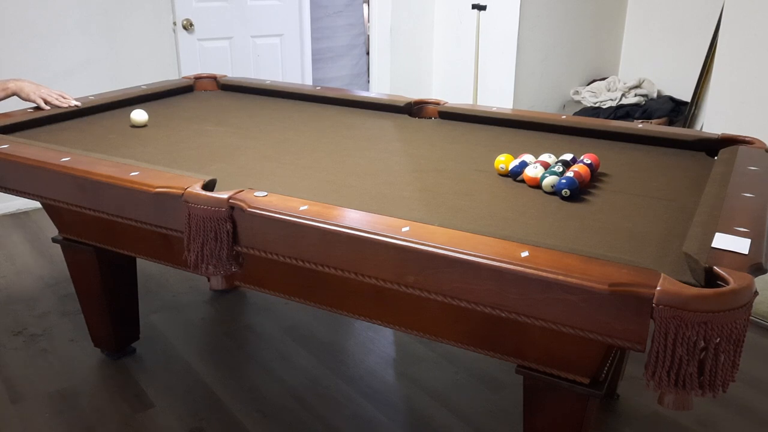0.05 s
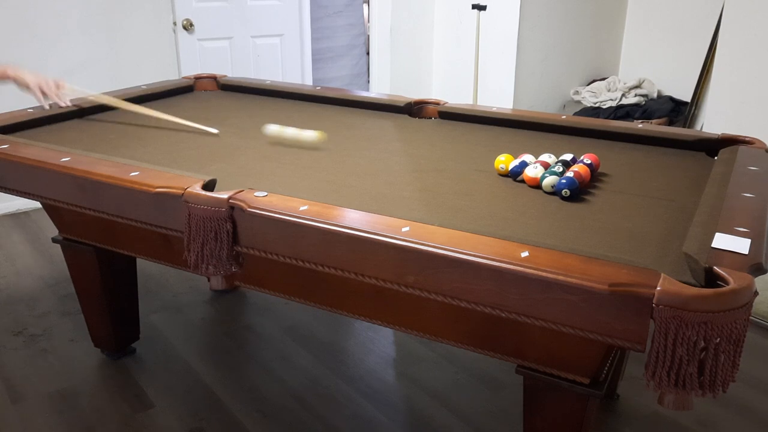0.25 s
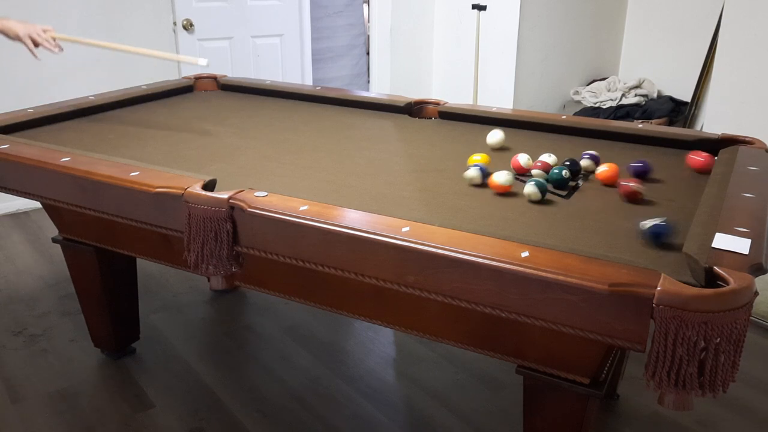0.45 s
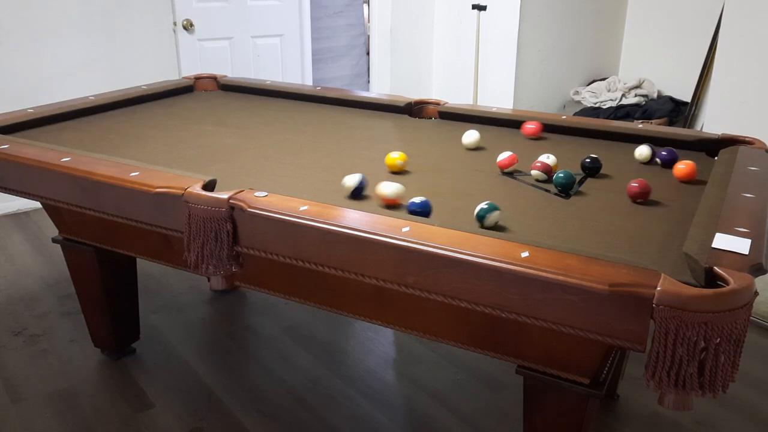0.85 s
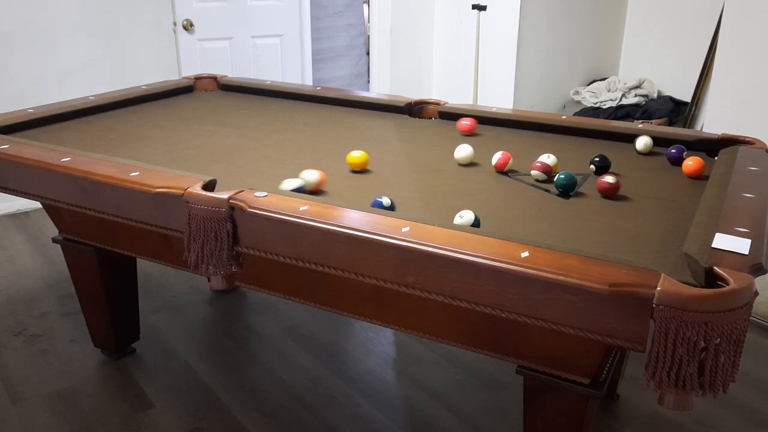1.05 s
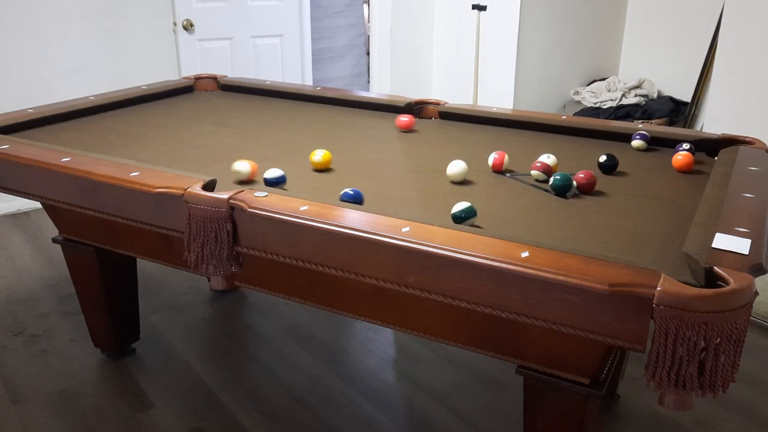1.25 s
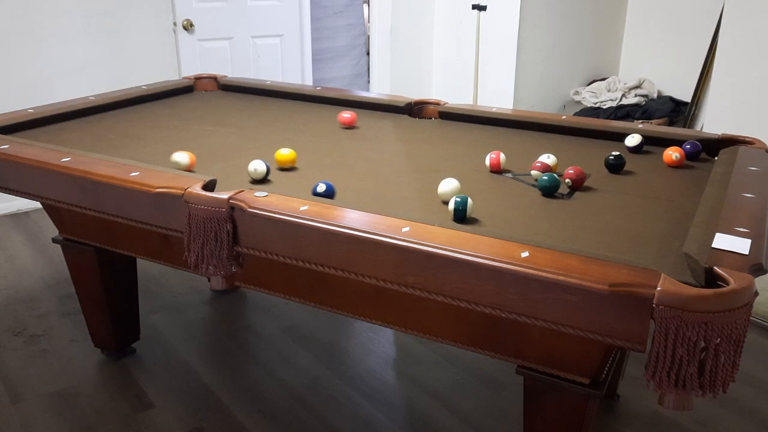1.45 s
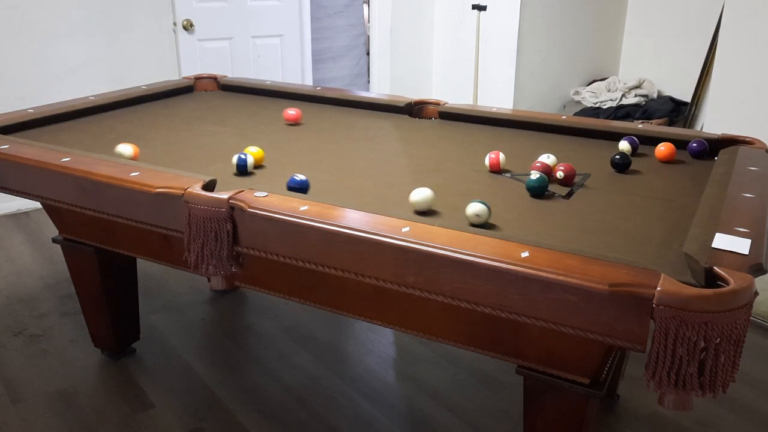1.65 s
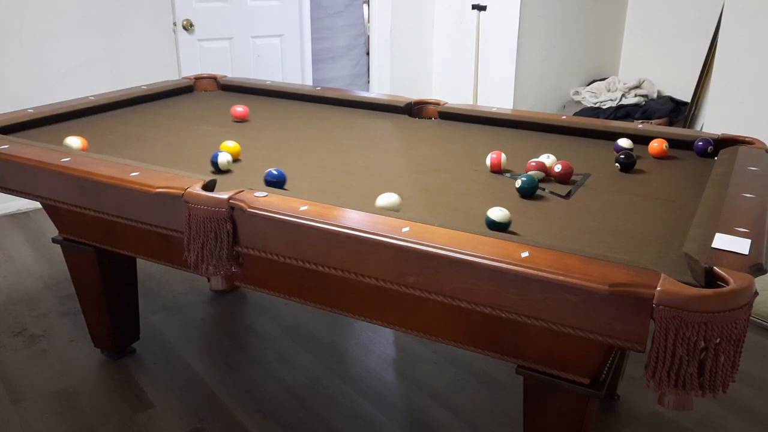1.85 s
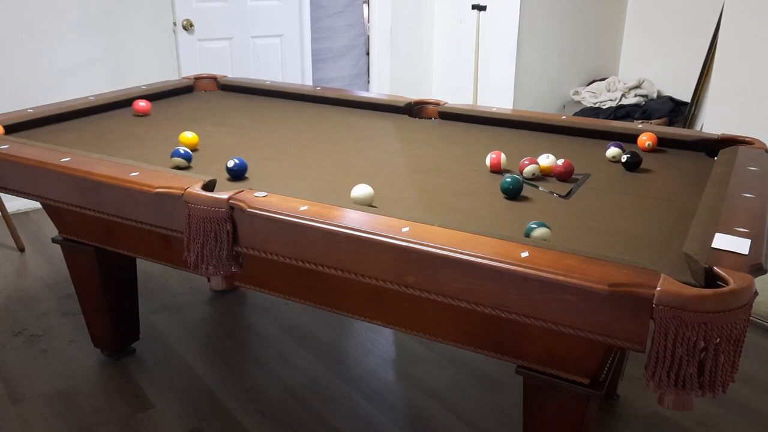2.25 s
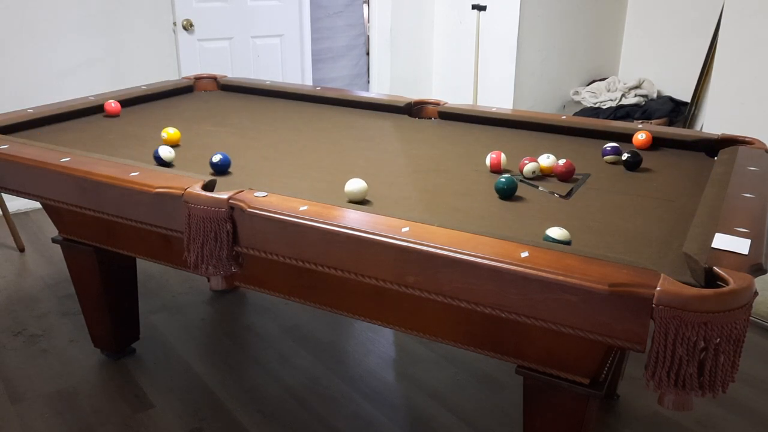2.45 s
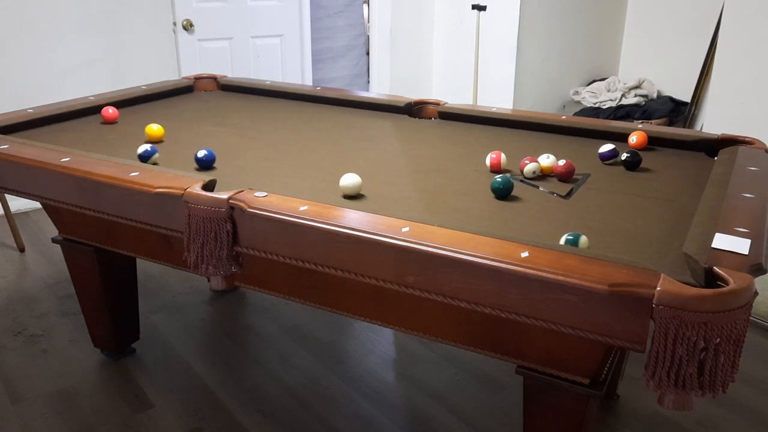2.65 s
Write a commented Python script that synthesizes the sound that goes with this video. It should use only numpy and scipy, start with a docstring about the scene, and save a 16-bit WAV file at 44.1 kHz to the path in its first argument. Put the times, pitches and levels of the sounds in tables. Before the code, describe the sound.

Pool balls crack apart on the break, then roll, click and knock around the table.

```python
"""A rack of pool balls cracks apart in a break shot, each elastic collision radiating one short pulse.
The cue first slides over the hand and thumps the white ball; then the balls click, rumble over the
cloth and bump the cushions, exciting the modes of the table's frame. One drops into a pocket, and two
hard clacks follow. A bare room reverberates over a soft hiss, and a limiter ducks under the crack."""
import sys
import numpy as np
from scipy import signal
from scipy.fft import rfft, irfft
from scipy.io import wavfile
from scipy.ndimage import uniform_filter1d, minimum_filter1d

SR = 44100
rng = np.random.default_rng(int(sys.argv[2]) if len(sys.argv) > 2 else 0)


def file_out(sig):
    """Save sig as 16-bit WAV at sys.argv[1]."""
    # one column per channel
    cols = np.atleast_2d(sig).T
    # limit, then scale
    lim = np.clip(cols, -1, 1)
    pcm = np.round(lim * 32767).astype(np.int16)
    wavfile.write(sys.argv[1], SR, pcm)


N = 123479


def amp(db):
    """The decibel scale: 20 dB is a factor of ten in amplitude."""
    return 10 ** (np.asarray(db) / 20)


def curve_at(points, hz):
    """Linear interpolation along log frequency."""
    f, value = np.transpose(points)
    return np.interp(np.log(hz + 1), np.log(f), value)


def add(mix, start_s, sound):
    """Superposition: a sound sums into the mix from its start time."""
    part = mix[:, round(start_s * SR):][:, :sound.shape[1]]
    part += sound[:, :part.shape[1]]


# Stereo width (frequency [Hz], side relative to mid [dB])
STEREO_WIDTH = [(60, -19.5), (150, -15), (300, -5.5), (600, -7), (1200, 1.5), (8000, 0)]
# Stereo balance (frequency [Hz], left minus right [dB])
STEREO_BALANCE = [(60, -1), (250, 1.5), (550, 5), (1100, -3.5), (2200, 2), (4300, -4.5), (8000, -4)]

def spread(spectra, hz):
    """Mid-side stereo: two independent spectra become left and right, nearly coherent in the bass."""
    width = amp(curve_at(STEREO_WIDTH, hz))
    lean = amp(curve_at(STEREO_BALANCE, hz) / 2)
    mid, side = spectra[0], width * spectra[1]
    return np.array([(mid + side) * lean, (mid - side) / lean]) / np.sqrt(1 + width ** 2)


# Reverberation time of the room (frequency [Hz], T60 [s])
ROOM_T60 = [(60, 0.02), (150, 0.82), (330, 0.5117), (800, 0.7972), (2000, 0.668), (4000, 0.5946),
            (7000, 0.63), (14000, 0.35)]

def room(direct_db, build_s, size=56000, echoes=10, echo_span_s=.035, echo_db=-20):
    """Room impulse response: direct sound, early reflections and an exponentially decaying tail."""
    t = np.arange(size) / SR
    density = np.minimum(.04 + t, 1)  # reflections arrive ever more densely
    taps = rng.standard_normal((2, size)) * (rng.random((2, size)) < density)
    hz, times, spectra = signal.stft(taps / np.sqrt(density), SR, nperseg=512)
    decay = amp(-60 * times[:, None] / curve_at(ROOM_T60, hz))
    spectra = spread(spectra.transpose(0, 2, 1), hz) * decay
    path = signal.istft(spectra.transpose(0, 2, 1), SR, nperseg=512)[1][:, :size]
    path *= 1 - np.exp(-t / build_s)
    tail_norm = np.linalg.norm(path[0])
    for channel in path:
        delays = (rng.random(echoes) * echo_span_s * SR).astype(int)
        channel[delays] += tail_norm * amp(echo_db) * rng.uniform(-1, 1, echoes)
    path[:, 0] += tail_norm * amp(direct_db)
    return path


def shaped_noise(envelope, spectrum):
    """Amplitude modulation: filtered noise of unit rms follows a level envelope."""
    hz = np.fft.rfftfreq(N, 1 / SR)
    white = spread(rfft(rng.standard_normal((2, N))), hz)
    noise = irfft(white * amp(curve_at(spectrum, hz)), N)
    noise /= np.sqrt(np.mean(noise ** 2) + 1e-20)
    return noise * amp(np.interp(np.arange(N) / SR, *np.transpose(envelope)))


# Envelope of the hiss (time [s], level [dB])
HISS_ENVELOPE = [(.3, -58), (.6, -71), (.76, -51), (1.05, -77.5), (1.2, -85.5), (1.55, -90.5), (1.92, -67),
                 (2.1, -70), (2.25, -62.5), (2.8, -53.5)]
# Its spectrum (frequency [Hz], relative level [dB])
HISS_SPECTRUM = [(500, -8.5), (1000, 5), (2200, -4.5), (3800, -9.5), (6000, -4.5), (7800, -15), (9500, -27),
                 (13000, -21)]

def hiss():
    """Broadband noise: a soft hiss swells and fades."""
    return shaped_noise(HISS_ENVELOPE, HISS_SPECTRUM)


# Envelope of the sliding cue (time [s], level [dB])
SLIDE_ENVELOPE = [(0, -55), (.13, -58), (.2, -53.5), (.25, -47.5), (.3, -90.5)]
# Its spectrum (frequency [Hz], relative level [dB])
SLIDE_SPECTRUM = [(50, -15.5), (230, -9.5), (350, 7.5), (500, -3), (800, -4), (2200, -5), (3800, -11),
                  (6000, -5.5), (9500, -23.5), (13000, -17.5)]

def cue_slide():
    """Sliding friction: the shaft rubs over the hand."""
    return shaped_noise(SLIDE_ENVELOPE, SLIDE_SPECTRUM)


# Envelope of the rolling balls (time [s], level [dB])
ROLL_ENVELOPE = [(0, -76), (.22, -70), (.3, -29), (.7, -43.5), (1.1, -58), (1.55, -60.5), (1.9, -62),
                 (2.15, -60.5), (2.3, -51.5), (2.8, -45.5)]
# Their spectrum (frequency [Hz], relative level [dB])
ROLL_SPECTRUM = [(22, -48), (55, 0.5), (90, 6), (150, 0.5), (260, -12), (330, -10.5), (420, -28),
                 (1500, -39.5), (5000, -55)]

def rolling():
    """Rolling contact noise: the balls rumble over the cloth."""
    return shaped_noise(ROLL_ENVELOPE, ROLL_SPECTRUM)


def pulse(spectrum, tilt_db, size=4096):
    """Minimum phase: the most compact causal pulse with a given spectrum, at unit energy."""
    hz = np.fft.rfftfreq(size, 1 / SR)
    octaves = np.log2(np.maximum(hz, 60) / 1000)
    dc_cut_db = 40 * np.exp(-hz / 10)
    cepstrum = irfft(np.log(amp(curve_at(spectrum, hz) + tilt_db * octaves - dc_cut_db)))
    cepstrum[1:size // 2] *= 2  # fold onto positive time
    cepstrum[size // 2 + 1:] = 0
    shape = irfft(np.exp(rfft(cepstrum)))
    return shape / np.linalg.norm(shape)


def impact(spectrum, direct_db, build_s, tilt_db=0):
    """Convolution: one contact pulse is heard through the room's impulse response."""
    return signal.fftconvolve(room(direct_db, build_s), pulse(spectrum, tilt_db)[None], axes=1)


def impacts(events, spectrum, direct_db, build_s):
    """Impulsive excitation: brief contacts whose only tail is the room's reverberation."""
    out = np.zeros((2, N))
    for s, db, tilt_db in events:
        add(out, s, amp(db) * impact(spectrum, direct_db, build_s, tilt_db))
    return out


def ring(modes, drive_db=0, size=56000, build_s=.01):
    """Free vibration: each mode is a damped sinusoid of random phase, with a smoothed onset."""
    t = np.arange(size) / SR
    hz, db, t60 = np.transpose(modes)
    cycles = hz[:, None] * t + rng.random((len(hz), 1))
    envelopes = amp((db + drive_db)[:, None] - 60 * t / t60[:, None])
    sines = envelopes * np.sin(2 * np.pi * cycles)
    return sines.sum(0)[None] * (1 - np.exp(-t / build_s)) ** 2


# Modes of the table's frame (frequency [Hz], relative level [dB], T60 [s])
FRAME_MODES = [(139.4, -6.5, 1.1), (315.6, -9.5, 0.83), (349.6, -7.5, 0.36), (396.5, -7, 0.46),
               (479, -7, 0.2), (522, -6.5, 0.43), (598, -11, 0.73)]

def frame(spectrum, tilt_db=0):
    """Modal excitation: each mode rings as strongly as the blow's spectrum drives it."""
    hz = np.transpose(FRAME_MODES)[0]
    slope_db = tilt_db * np.log2(hz / hz[0]) - max(2 * tilt_db, 0)
    return ring(FRAME_MODES, curve_at(spectrum, hz) + slope_db)


def padded_impacts(events, spectrum, frame_db, direct_db):
    """Structural coupling: padded blows also set the table's frame ringing."""
    out = impacts(events, spectrum, direct_db, build_s=.0079)
    for s, db, tilt_db in events:
        add(out, s, amp(db + frame_db) * frame(spectrum, tilt_db))
    return out


# Ball falling into the pocket (time [s], level [dB], tilt [dB/octave])
POCKET_HITS = [(2.323, -35.5, -1), (2.345, -22, -4), (2.376, -29, -2), (2.47, -29, -9), (2.52, -32, -6)]
# Spectrum of each hit (frequency [Hz], relative level [dB])
POCKET_SPECTRUM = [(25, -33), (42, -28), (65, -13.5), (140, -6.5), (185, -11.5), (320, 7.5), (410, -2.5),
                   (520, -16), (3000, -48)]

def pocket_drop():
    """Inelastic impact: a ball lands in the pocket in a few dull knocks."""
    return padded_impacts(POCKET_HITS, POCKET_SPECTRUM, frame_db=3.5, direct_db=-4)


# Ball on cushion (time [s], level [dB], tilt [dB/octave])
CUSHION_HITS = [(.325, -17, 0.5), (.515, -16.5, 1.5), (.555, -20.5, 2), (.615, -23.5, 3.5),
                (.665, -26.5, 2.5), (.86, -41, 4), (1.13, -61.5, -2), (1.345, -46, -11), (1.395, -67.5, -9),
                (1.61, -53.5, -10), (1.665, -55, -4.5)]
# Spectrum of each hit (frequency [Hz], relative level [dB])
CUSHION_SPECTRUM = [(25, -52), (42, -21.5), (65, -4.5), (120, 0), (190, -8), (320, 7), (560, -7.5),
                    (900, -12.5), (5000, -81.5)]

def cushion_bumps():
    """Compliant contact: a cushion yields, so the energy lies at low frequencies."""
    return padded_impacts(CUSHION_HITS, CUSHION_SPECTRUM, frame_db=-4, direct_db=-7.5)


# Hard wooden clacks (time [s], level [dB], tilt [dB/octave])
CLACK_HITS = [(2.221, -46.5, -4.5), (2.4165, -20.5, 2), (2.426, -28, -0.5), (2.7325, -23.5, 2)]
# Spectrum of each hit (frequency [Hz], relative level [dB])
CLACK_SPECTRUM = [(150, -26), (500, -7.5), (800, -2), (1400, -4), (2400, -0.5), (3800, -6.5), (4900, -14),
                  (6600, -10), (7700, -26.5), (9200, -47), (11500, -36), (15500, -44)]

def wooden_clacks():
    """Stiff contact: a brief blow on wood has a broad spectrum."""
    return impacts(CLACK_HITS, CLACK_SPECTRUM, direct_db=-25.5, build_s=.0029)


# Cue on the white ball (time [s], thump level [dB], tick level [dB])
CUE_HIT = (.235, -9.5, -17)
# Spectra of the tip's thump and the shaft's tick (frequency [Hz], relative level [dB])
THUMP_SPECTRUM = [(25, -58), (45, -36), (90, -11.5), (190, -12.5), (300, 3), (600, 1), (800, -9.5),
                  (1300, -22.5), (5000, -82)]
TICK_SPECTRUM = [(300, -11.5), (1000, 0.5), (1550, -7), (2300, -1.5), (3200, -7), (5000, -15), (6500, -15),
                 (8000, -25), (9300, -47), (12000, -31.5), (15500, -34.5)]
# Modes of the shaft (frequency [Hz], relative level [dB], T60 [s])
SHAFT_MODES = [(930, -27.5, .4), (1956, -31.5, 0.46), (2244, -30.5, 0.57), (2490, -32, .4),
               (2740, -33.5, 0.7), (3480, -38, .3), (6450, -40.5, .45)]

def cue_strike(frame_db=-6.5, shaft_db=18.5, tick_delay_s=.004):
    """Impact and resonance: the leather tip thumps, the frame rings, and the shaft ticks and rings."""
    out = np.zeros((2, N))
    s, thump_db, tick_db = CUE_HIT
    add(out, s, amp(thump_db) * impact(THUMP_SPECTRUM, direct_db=-10, build_s=.001))
    add(out, s, amp(thump_db + frame_db) * frame(THUMP_SPECTRUM))
    add(out, s + tick_delay_s, amp(tick_db) * impact(TICK_SPECTRUM, direct_db=-19.5, build_s=.0004))
    add(out, s + tick_delay_s, amp(tick_db + shaft_db) * ring(SHAFT_MODES))
    return out


# Ball on ball (time [s], click level before the low-pass [dB], cutoff [Hz], snap level [dB])
BALL_HITS = [(0.3969, -1, 2810, -45), (0.3991, -8.5, 3950, -40), (0.416, -7, 3230, -49),
             (0.4337, -9, 3200, -57), (.452, -7, 3300, -48.5), (0.8525, -20.5, 2790, -54),
             (1.270, -39.5, 2148, -100), (1.5833, -27, 2540, -63.5), (1.685, -30, 2530, -69),
             (2.105, -52, 1830, -110), (2.141, -34.5, 1895, -103)]
# Spectra of the click and its thin, high snap (frequency [Hz], relative level [dB])
CLICK_SPECTRUM = [(150, -25.5), (500, -20.5), (1000, -6.5), (1700, 0.5), (2500, 1.5), (3300, -8),
                  (4500, -7), (6500, -5.5), (9000, -10.5), (15000, -3)]
SNAP_SPECTRUM = [(3000, -32), (5500, -1), (8000, -10.5), (9500, -15.5), (12000, -5), (14700, 6),
                 (16000, -4.5)]

def ball_collisions():
    """Elastic collision: contact time limits bandwidth, so a gentler, longer contact sounds duller."""
    out = np.zeros((2, N))
    for s, db, cutoff_hz, snap_db in BALL_HITS:
        lowpass = signal.butter(5, cutoff_hz, fs=SR, output="sos")
        click = impact(CLICK_SPECTRUM, direct_db=-12.5, build_s=.004)
        add(out, s, amp(db) * signal.sosfilt(lowpass, click))
        add(out, s, amp(snap_db) * impact(SNAP_SPECTRUM, direct_db=-10.5, build_s=.001))
    return out


def scene():
    """Superposition: the impacts add to the continuous noises."""
    background = rolling() + cue_slide() + hiss()
    hard_hits = cue_strike() + ball_collisions() + wooden_clacks()
    return background + hard_hits + pocket_drop() + cushion_bumps()


def record(dry, threshold_db=-12, recover_db_per_s=15, window=180, band_edge_hz=16000):
    """Look-ahead limiting: treble power lowers the gain, which recovers slowly; a low-pass follows."""
    treble = signal.lfilter(*signal.butter(1, 900, "high", fs=SR), dry)
    power_db = 10 * np.log10(abs(uniform_filter1d((treble ** 2).mean(0), window)) + 1e-12)
    recovery_db = np.arange(N) / SR * recover_db_per_s
    held_db = np.maximum.accumulate(power_db + recovery_db) - recovery_db
    excess_db = np.maximum(held_db - threshold_db, 0)
    gain_db = uniform_filter1d(minimum_filter1d(-excess_db, 2 * window), window)  # ducks a few ms early
    limited = np.clip(dry * amp(gain_db), -1, 1)
    lowpass = signal.firwin(511, band_edge_hz, window=("kaiser", 9), fs=SR)
    return signal.oaconvolve(limited, lowpass[None], "same")


dry = scene()
out = record(dry)
file_out(out)
```